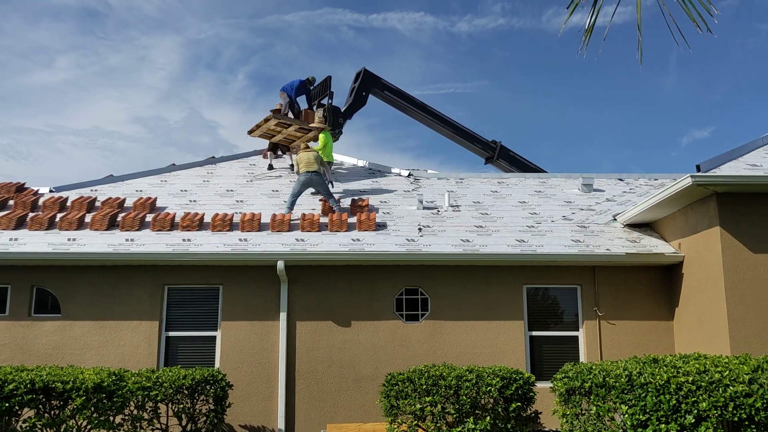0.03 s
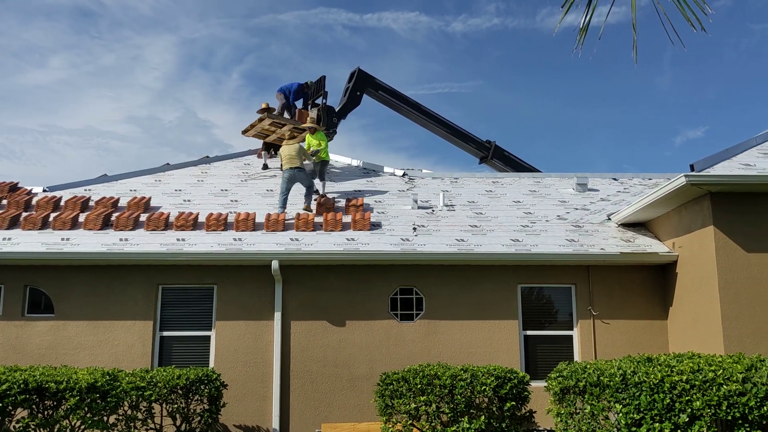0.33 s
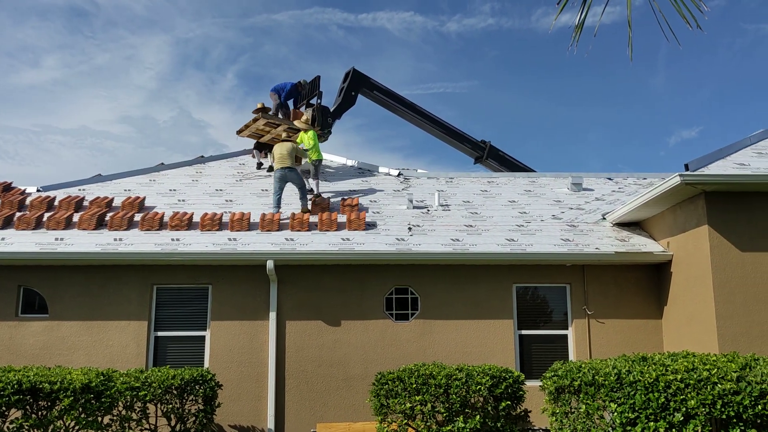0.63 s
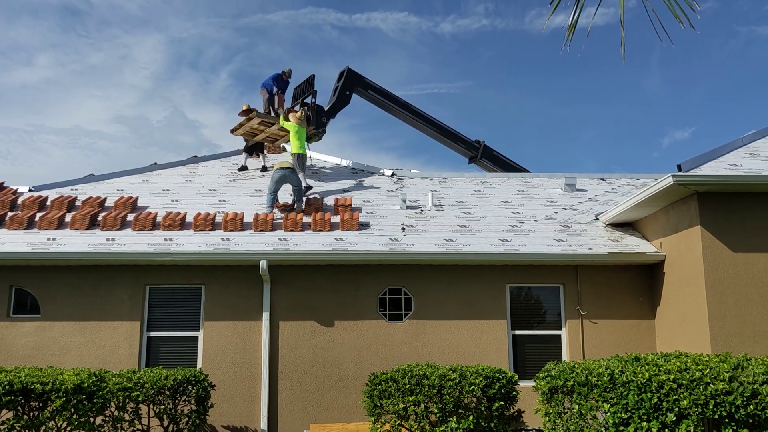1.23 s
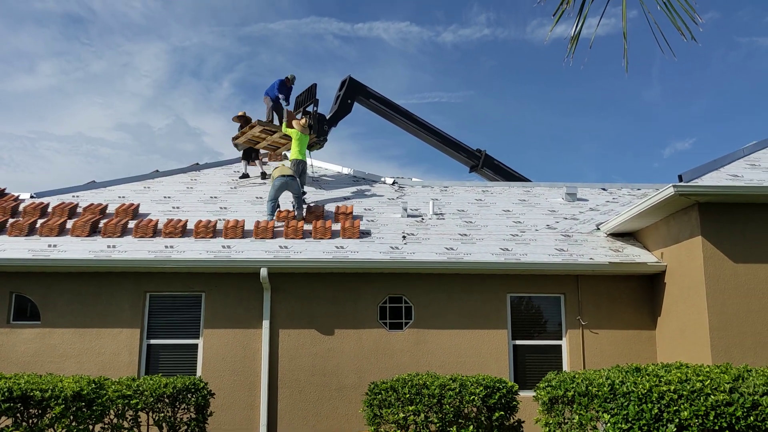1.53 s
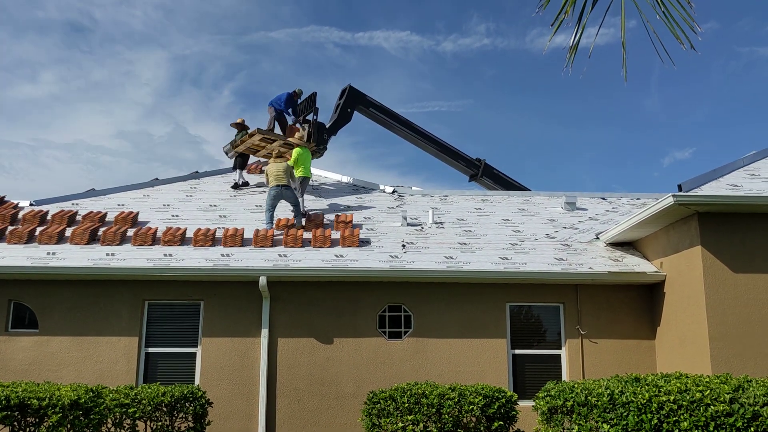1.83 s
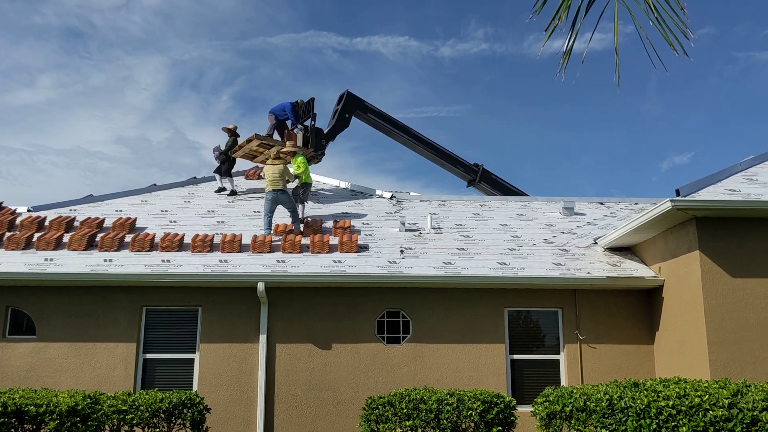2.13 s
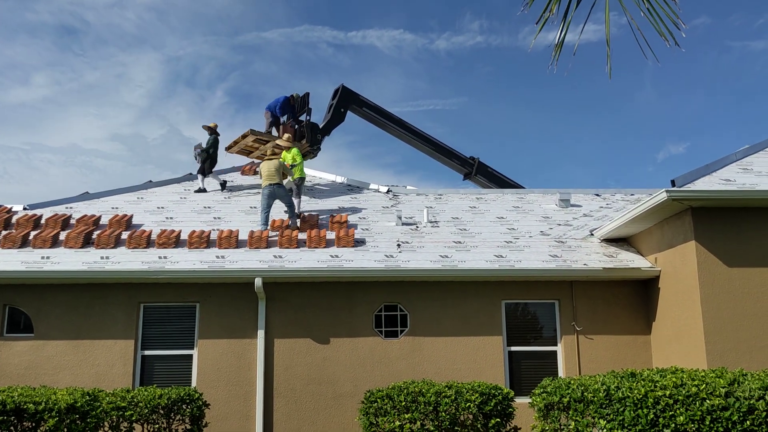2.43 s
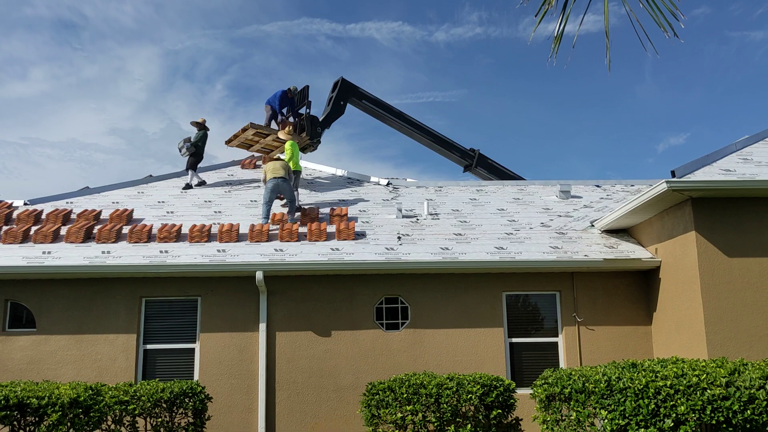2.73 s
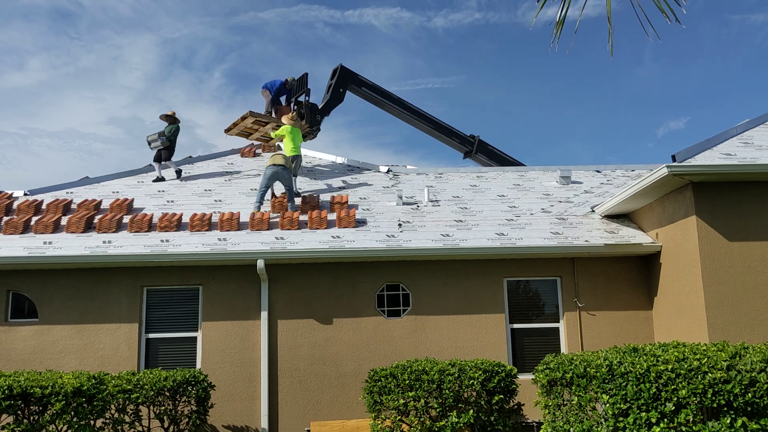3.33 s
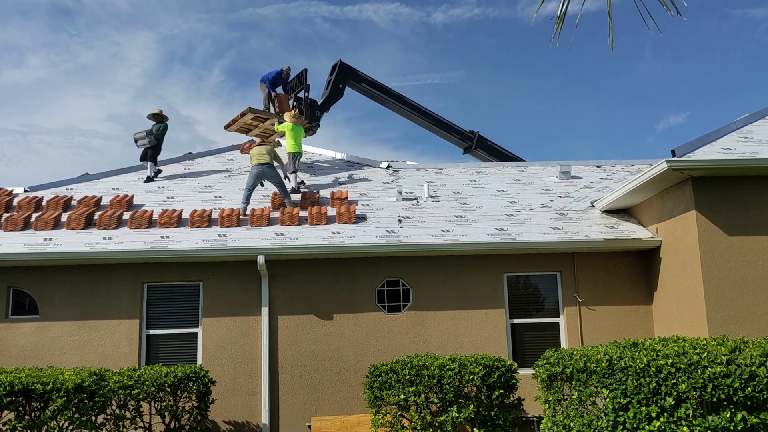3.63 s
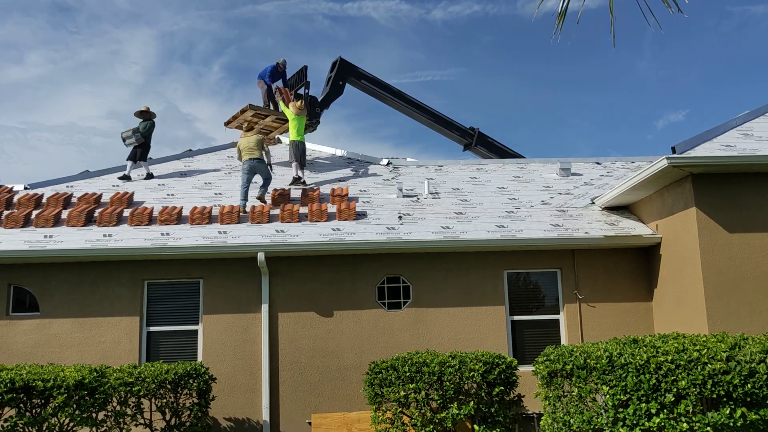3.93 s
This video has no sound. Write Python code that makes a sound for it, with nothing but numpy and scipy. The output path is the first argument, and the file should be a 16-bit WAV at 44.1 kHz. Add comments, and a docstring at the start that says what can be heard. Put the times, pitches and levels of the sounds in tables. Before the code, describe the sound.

Roof tiles are set down outdoors with light knocks and scrapes, a heavy booming drop, hollow clonks and a last loud clatter, each echoing briefly. Dry scuffs come from close by, while an engine idles faintly in a breeze.

```python
"""In a garden, below a roof where roofers unload heavy tiles from a lifted pallet and stack them.
Impacts excite the tiles' damped modes (clacks, clinks, hollow clonks), friction makes them scrape and
squeal, and the wooden deck booms under the load. The houses return the sound as echoes.
Dry, sandy scuffs sound close by, and the lift's engine idles under a light wind."""
import sys
import numpy as np
from scipy import signal
from scipy.fft import rfft, irfft
from scipy.io import wavfile

SR = 44100
rng = np.random.default_rng(int(sys.argv[2]) if len(sys.argv) > 2 else 0)


def waveform_to_disk(signal):
    """Save audio, clipped to [-1, 1], as 16-bit WAV at the path in sys.argv[1]."""
    frames = np.transpose(np.atleast_2d(signal))
    scaled = np.clip(frames, -1, 1) * 32767
    samples = np.round(scaled).astype(np.int16)
    wavfile.write(sys.argv[1], SR, samples)


N = 176400


def tile_clacks():
    """Impact excitation: tile strikes tile, each blow with its own balance of modes."""
    # t/s, low, middle and high level/dB, decay factor, rise/s, pitch factor
    blows = [(.296, -40.5, -26.5, -30.5, 0.83, 0.0063, 0.99),
             (0.351, -46.5, -34.5, -44, 1.45, 0.0037, 0.85), (.461, -37, -30, -35.5, 1.55, 0.0015, .88),
             (.490, -36, -35, -51, 1.2, 0.0028, 0.89), (.561, -42.5, -30, -35.5, 1.2, 0.0015, 0.96),
             (0.704, -47.5, -40.5, -43, 0.94, 0.0053, .92), (.929, -61, -52, -45, 1.5, 0.0018, 1.01),
             (1.317, -66, -52, -40, 0.24, 0.00074, 1.2), (2.238, -56.5, -39, -40, 1.9, 0.0049, 1.14),
             (2.279, -48.5, -40.5, -45.5, 3.5, 0.0088, 0.99), (3.223, -43.5, -32, -37, 2.75, 0.0024, 0.97),
             (3.292, -45, -21, -20.5, 1.27, 0.0043, 1.045), (3.301, -31.5, -26.5, -14, 1, 0.0036, 1),
             (3.318, -34.5, -18, -13, 0.85, 0.0028, 1.04), (3.353, -49, -31, -40, 1.6, 0.0034, 1.03),
             (3.388, -57, -31, -30.5, 0.9, 0.0084, 1.11), (3.406, -40.5, -24.5, -28, 1.1, 0.0062, 0.98),
             (3.734, -44.5, -46, -57, 0.62, 0.0023, 0.83)]
    return track((start, knock(tile_modes(), *blow, crunch_db=1)) for start, *blow in blows)


def bundle_drop():
    """Free vibration: a heavy bundle of tiles lands and settles, ringing at each contact."""
    # t/s, low, middle and high level/dB, decay factor, rise/s
    landings = [(1.465, -16.5, -20, -38, 1, 0.00087), (1.4727, -20, -15.5, -11.5, 1, 0.0021),
                (1.498, -36, -22.5, -24, 0.55, 0.0048), (1.546, -33.5, -29.5, -50, 0.7, 0.0042)]
    # Modes of the bundle: f/Hz, relative level/dB, nominal T60/s
    modes = [(322, -1.5, 0.065), (678, 2, .08), (772, -3, 0.13), (860, -4.5, 0.17), (1164, -1.5, 0.091),
             (1584, -0.5, 0.065), (1920, 3, 0.032), (2133, -1, .08), (2622, -1.5, 0.09),
             (3320, -12.5, 0.082), (3920, -16, 0.077)]
    return track((start, knock(modes, *blow, crunch_db=-3)) for start, *blow in landings)


def loose_clinks():
    """Free vibration: a loose tile settles, and its strong upper modes make it sound bright."""
    # t/s, low, middle and high level/dB, decay factor, rise/s
    contacts = [(1.362, -37, -28, -31.5, 1.1, 0.0094), (1.595, -48, -25, -21, 0.74, 0.0086),
                (1.620, -61, -31, -33, 1.5, 0.0027), (1.650, -53, -26.5, -29.5, 1.08, 0.0011)]
    # Modes of the loose tile: f/Hz, relative level/dB, nominal T60/s
    modes = [(310, -14, 0.088), (707.5, -7, 0.14), (901.7, -9, 0.2), (1127, -12, 0.055), (1353, -11, 0.12),
             (1646, -4.5, 0.078), (2150, 3.5, 0.067), (2340, -5, 0.055), (2690, 0, 0.058)]
    return track((start, knock(modes, *blow, crunch_db=3.5)) for start, *blow in contacts)


def stack_clonks():
    """Resonance: a tile set down on a stack rings hollow, with one middle mode dominant."""
    # t/s, low, middle and high level/dB, decay factor, pitch factor
    contacts = [(2.560, -44, -23, -26, 1.4, 0.78), (2.585, -45.5, -24, -32.5, 0.97, 0.96),
                (2.611, -50, -26.5, -42, 1.05, 0.94), (2.648, -43.5, -25, -35.5, 1.4, 0.8),
                (2.745, -29.5, -17, -31, 0.63, 0.95), (2.806, -48.5, -33.5, -45, 1.8, 0.93),
                (2.851, -45, -26, -39, 0.98, 0.81)]
    # Modes of the stack: nominal f/Hz, relative level/dB, nominal T60/s
    modes = [(270, -6.5, 0.085), (552, -12, 0.097), (693.4, 1, 0.071), (950, -9.5, 0.061),
             (1424, -12.5, 0.14), (1860, -6, 0.11), (2700, -6.5, 0.094)]
    return track((start, knock(modes, *blow, rise_s=0.0038, pitch=pitch))
                 for start, *blow, pitch in contacts)


def knock(modes, low_db, middle_db, high_db, decay, rise_s, pitch=1, crunch_db=0):
    """Impact: a gritty contact rings the modes; how the tile lands sets the level of three bands."""
    # Low, middle and high band: lower f/Hz, upper f/Hz
    bands = [(170, 470), (470, 1100), (1100, 15000)]
    # Contact noise: f/Hz, relative spectral level/dB
    crunch_spectrum = [(200, -2), (300, -11), (430, -8.5), (600, -0.5), (1500, -4.5), (2700, 1.5),
                       (3300, -22), (3950, -13.5), (5000, -21), (15000, -69)]
    crunch_t60_s, strike_s = 0.072, 0.017
    t, strike = np.arange(SR // 3) / SR, slice(round(strike_s * SR))
    body = ring(modes, t, decay, pitch)
    crunch = colour(grit(t, spread_db=-1), crunch_spectrum)
    crunch *= amp(crunch_db - 60 * t / (crunch_t60_s * decay))
    contact = (body / body[strike].std() + crunch) * np.minimum(t / rise_s, 1)
    sound = np.zeros(len(t))
    for band, db in zip(bands, (low_db, middle_db, high_db)):
        part = signal.sosfilt(signal.butter(3, band, "bandpass", fs=SR, output="sos"), contact)
        sound += amp(db) * part / part[strike].std()
    return sound


def tile_modes(spread_db=3, t60_s=0.085):
    """Modal excitation: where a tile is struck, here by chance, decides how strongly each mode rings."""
    # Natural frequencies of a tile: f/Hz
    mode_hz = [258, 323, 528, 675, 776, 899, 1179, 1247, 1493, 1618, 1770, 2094, 2172, 2612, 2903, 3300,
               3920]
    # Mean strength of each mode: relative level/dB
    mode_db = [-2.5, -5, -2, 1, -2, -3.5, 1, -4.5, -0.5, 1, -3, 3, -5, 0.5, -8.5, -13, -9]
    return [(hz, db + spread_db * rng.standard_normal(), t60_s) for hz, db in zip(mode_hz, mode_db)]


def ring(modes, t, decay, pitch, phase_spread=1):
    """Modal superposition: a sum of damped sines; decay scales each T60, pitch each frequency."""
    return sum(amp(db - 60 * t / (t60 * decay))
               * np.sin(2 * np.pi * (hz * pitch * t + phase_spread * rng.random()))
               for hz, db, t60 in modes)


def edge_tones(bandwidth_hz=47):
    """Narrow resonance: short tones from tile edges, heard as gliding squeals and one faint clink."""
    # t/s, duration/s, first f/Hz, last f/Hz, level/dB
    tones = [(.422, .035, 756, 820, -38), (.482, 0.034, 480, 590, -38), (.635, .03, 825, 880, -44.5),
             (.957, .09, 1085, 1260, -44.5), (0.966, 0.096, 1810, 1770, -46.5)]
    pole = np.exp(-np.pi * bandwidth_hz / SR)
    out = np.zeros(N)
    for start, length, from_hz, to_hz, db in tones:
        t = np.arange(0, length, 1 / SR)
        carrier = np.exp(2j * np.pi * np.cumsum(np.linspace(from_hz, to_hz, len(t))) / SR)
        # Shifted down, low-passed and shifted back, the noise keeps only a band around the glide.
        baseband = signal.lfilter([1 - pole], [1, -pole], grit(t, spread_db=4.5) / carrier)
        tone = (carrier * baseband).real
        add(out, start, amp(db) * unit(tone * np.sin(np.pi * t / length) ** .5))
    return out


def tile_scrapes():
    """Sliding friction: tile rubs unevenly on tile, and the noise drives the tile's modes."""
    # t/s, duration/s, level/dB
    slides = [(0, 0.14, -41), (0.268, 0.14, -38.5), (0.406, 0.18, -41), (0.96, 0.086, -45),
              (1.137, 0.21, -47), (1.30, 0.22, -41.5), (1.802, 0.2, -53), (2.557, 0.34, -41),
              (3.33, 0.16, -39.5)]
    # Friction noise: f/Hz, relative spectral level/dB
    rub_spectrum = [(150, -8.5), (260, -7), (400, -10), (560, 4), (850, 2), (1200, -1), (1700, 1.5),
                    (2700, -3.5), (3300, -15.5), (5500, -21), (15000, -67)]
    out = np.zeros(N)
    for start, length, db in slides:
        t = np.arange(0, length, 1 / SR)
        stroke = np.sin(np.pi * t / length) ** .5 * amp(1.9 * wander(t, rate_hz=42.1))
        rub = colour(grit(t, spread_db=1.5), rub_spectrum)
        response = ring(tile_modes(), t, decay=0.32, pitch=0.99)
        singing = unit(signal.fftconvolve(rub, response)[:len(t)])
        add(out, start, amp(db) * unit(stroke * (rub + amp(-4) * singing)))
    return out


def grit(t, spread_db, snaps_per_s=900):
    """Shot noise of a rough contact: small snaps of uneven size over fine noise."""
    hits = rng.random(len(t)) < snaps_per_s / SR
    sizes = amp(spread_db * np.minimum(rng.exponential(1, len(t)), 3))
    fine, sign = rng.standard_normal((2, len(t)))
    return unit(hits * sizes * np.sign(sign)) + amp(-0.5) * fine


def deck_booms(rise_s=0.013):
    """Transient response: a sudden load starts the low modes of the wooden deck in phase."""
    # t/s, level/dB, pitch factor
    loads = [(1.363, -30, 0.99), (1.47, -24, 0.53), (1.481, -21, 1.45), (1.486, -24.5, 0.93),
             (1.542, -28, 1.3), (3.225, -32.5, 1.09), (3.302, -24.5, 1.06), (3.387, -27, 1.12)]
    # Modes of the deck: nominal f/Hz, relative level/dB, nominal T60/s
    modes = [(83.1, 0, 0.33), (95.9, -3, 0.25), (272, -24, .1)]
    t = np.arange(SR // 2) / SR
    onset = np.sqrt(2) * np.minimum(t / rise_s, 1)
    return track((start, amp(db) * onset * ring(modes, t, decay=0.86, pitch=pitch, phase_spread=0))
                 for start, db, pitch in loads)


def near_scuffs(hiss_rise_s=0.002, body_rise_s=0.0053):
    """Friction noise of short sandy rubs: a sharp hiss, then a duller body; both hold and die away."""
    # t/s, hold/s, T60/s, relative hiss level/dB, relative body level/dB
    rubs = [(0.086, 0.006, 0.092, -56.5, -45), (0.138, 0.012, 0.2, -59, -44.5),
            (0.231, 0.017, 0.14, -54.5, -42.5), (0.369, 0.023, .1, -59, -47),
            (0.456, 0.008, 0.24, -46, -35.5), (0.51, 0.016, 0.11, -58, -49),
            (.546, 0.0017, .03, -36.5, -41), (1.313, 0.0025, 0.09, -47.5, -34),
            (1.468, 0.0078, 0.17, -51, -37), (1.591, 0.089, 0.13, -58.5, -51.5),
            (1.727, 0.017, 0.088, -52.5, -41), (1.804, 0.011, 0.17, -53.5, -38.5),
            (1.933, 0.025, 0.075, -50, -41), (1.99, 0.028, 0.05, -53, -42.5),
            (2.084, 0.01, 0.058, -59, -65), (2.339, 0.028, 0.11, -38.5, -27),
            (2.423, 0.039, 0.14, -47.5, -33.5), (2.552, 0.0046, 0.15, -40.5, -33.5),
            (2.637, 0.0062, 0.24, -44, -44), (2.688, 0.026, 0.51, -54, -46),
            (2.888, 0.0065, 0.06, -45, -69), (3.299, 0.0048, 0.1, -37, -16.5),
            (3.372, 0.029, 0.084, -53, -51), (3.731, 0.013, 0.04, -56.5, -44)]
    # Hiss common to both channels: f/Hz, relative spectral level/dB
    hiss_spectrum = [(1500, -35), (3500, -19), (5000, 14), (7000, -12), (8000, -26.5), (10000, -21),
                     (15000, -11)]
    # Body of the rub: f/Hz, relative spectral level/dB
    body_spectrum = [(150, -25.5), (280, -2.5), (600, -5), (1500, -2.5), (2300, 0.5), (3200, -2.5),
                     (4200, -4), (6000, -12), (15000, -58)]
    # Hiss independent in each channel: f/Hz, relative spectral level/dB
    fizz_spectrum = [(2500, -4), (5000, -1.5), (7000, 5.5), (8000, -6.5), (10000, 0), (15000, -10.5)]
    hiss_gain, body_gain = np.zeros((2, N))
    t = np.arange(SR // 3) / SR
    for start, hold, t60, hiss_db, body_db in rubs:
        fade = amp(-60 * np.maximum(t - hold, 0) / t60)
        add(hiss_gain, start, amp(hiss_db) * fade * np.minimum(t / hiss_rise_s, 1))
        add(body_gain, start, amp(body_db) * fade * np.minimum(t / body_rise_s, 1))
    grains = sand_crackle(spread_db=3)
    hiss = amp(-10) * hiss_gain * colour(grains, hiss_spectrum)
    body = body_gain * colour(grains, body_spectrum)
    fizz = np.array([colour(sand_crackle(spread_db=4), fizz_spectrum) for channel in range(2)])
    return stereo(hiss + body, lag_s=.00008, left_db=1.7) + amp(0.5) * hiss_gain * fizz


def sand_crackle(spread_db, grains_per_s=6000, grain_s=.002):
    """Shot noise: sand grains snap at random times, each with its own pitch and size."""
    when, pitch, size = rng.random((int(grains_per_s * N / SR), 3)).T[:, :, None]
    k = np.arange(round(grain_s * SR))
    strength = amp(-spread_db * np.log(np.maximum(size, .05)))
    grains = strength * (1 - k / len(k)) ** 2 * np.sin(np.pi * pitch * k)
    positions = (when * N).astype(int) + k
    return np.bincount(positions.ravel(), grains.ravel(), N)[:N]


def early_echoes(direct):
    """Specular reflection: roof and walls return delayed, weaker copies."""
    # delay/s, relative level/dB
    paths = [(.0105, -15.5), (.026, -21), (.066, -25)]
    return track((delay, amp(db) * direct) for delay, db in paths)


def yard_reverb(x, echoes_per_s=3000, rise_s=0.0039):
    """Scattering: houses and hedges return dense echoes, each band dying at its own rate."""
    # Reverberation time: f/Hz, T60/s
    decay_times = [(80, 1), (300, 0.46), (800, 0.68), (2500, 0.54), (5000, 0.3), (15000, 0.51)]
    taps = rng.standard_normal((2, SR)) * (rng.random((2, SR)) < echoes_per_s / SR)
    hz, t, bands = signal.stft(diffuse(taps), SR, nperseg=256)
    envelope = amp(-60 * t / read(decay_times, hz)[:, None]) * np.minimum(t / rise_s, 1)
    tail = signal.istft(bands * envelope, SR, nperseg=256)[1]
    return signal.fftconvolve(x[None], tail / np.linalg.norm(tail[0]), axes=1)[:, :N]


def lift_engine():
    """Modulated tones: the idling engine hums in low partials that waver in level and phase."""
    # f/Hz, level/dB
    partials = [(30, -56), (60.3, -57.5), (90.5, -57.5), (101, -61), (121, -56)]
    t, hum = np.arange(N) / SR, np.zeros(N)
    for hz, db in partials:
        peak = np.sqrt(2) * amp(db + 2 * wander(t, rate_hz=3.6))
        hum += peak * np.sin(2 * np.pi * hz * t + wander(t, rate_hz=2.305))
    return hum


def wind_gusts():
    """Pressure fluctuation: soft gusts on the microphone make brief swells of rumble."""
    # t/s, duration/s, level/dB
    gusts = [(0.578, 0.12, -42), (2.04, 0.11, -44.5)]
    # Rumble: f/Hz, relative spectral level/dB
    spectrum = [(10, 11), (30, 17), (60, 11), (110, -8), (300, -50), (2000, -90)]
    out = np.zeros(N)
    for start, length, db in gusts:
        swell = np.hanning(round(length * SR))
        rumble = colour(rng.standard_normal(SR), spectrum)[:len(swell)]
        add(out, start, amp(db) * unit(swell * rumble))
    return out


def outdoor_air(level_db=-45, breeze_top_hz=1500):
    """Diffuse ambient noise: its lower part wavers in the breeze while the treble stays steady."""
    # f/Hz, relative spectral level/dB
    spectrum = [(12, -32), (20, 0.5), (129, -14.5), (153, -21), (274, -25.5), (416, -35), (686, -24),
                (1050, -28), (1920, -26.5), (4550, -39.5), (5850, -47), (10500, -49), (15500, -50)]
    air = colour(diffuse(rng.standard_normal((2, N))), spectrum)
    breeze = signal.sosfilt(signal.butter(2, breeze_top_hz, fs=SR, output="sos"), air)
    waver = amp(1.46 * wander(np.arange(N) / SR, rate_hz=9)) - 1
    return amp(level_db) * (air + breeze * waver)


def diffuse(pair):
    """Diffuse-field coherence: two independent noises are made alike in the bass."""
    # f/Hz, left-right correlation
    coherence = [(50, 0.97), (300, .95), (1000, 0.088), (2500, 0.041), (5000, 0.041), (15000, 0.037)]
    left, other = rfft(pair)
    alike = read(coherence, freqs(pair))
    right = alike * left + np.sqrt(1 - alike ** 2) * other
    return irfft(np.array([left, right]), pair.shape[-1])


def stereo(x, lag_s, left_db=0):
    """Path difference: sound from the right reaches the left later; left_db is left over right."""
    left = irfft(rfft(x) * np.exp(-2j * np.pi * freqs(x) * lag_s), len(x))
    return np.array([left * amp(left_db / 2), x * amp(-left_db / 2)])


def wander(t, rate_hz):
    """Random modulation: a sum of sines below rate_hz, rms about 1."""
    f, phase = rng.random((2, 16, 1))
    return np.sin(2 * np.pi * (rate_hz * f * t + phase)).sum(0) / np.sqrt(len(f) / 2)


def colour(x, spectrum):
    """Spectral shaping, at rms 1."""
    return unit(irfft(rfft(x) * amp(read(spectrum, freqs(x))), x.shape[-1]))


def read(points, hz):
    """Interpolation on a log-frequency axis."""
    f, value = np.transpose(points)
    return np.interp(np.log(hz + 1), np.log(f + 1), value)


def freqs(x):
    """Frequencies of the spectrum of x."""
    return np.fft.rfftfreq(x.shape[-1], 1 / SR)


def amp(db):
    """Level to amplitude ratio."""
    return 10 ** (np.asarray(db) / 20)


def unit(x):
    """Normalisation to rms 1."""
    return x / np.sqrt(np.mean(x ** 2) + 1e-20)


def add(mix, start_s, sound):
    """Superposition of one sound on the mix."""
    part = mix[round(start_s * SR):][:len(sound)]
    part += sound[:len(part)]


def track(events):
    """Superposition of (t/s, sound) pairs."""
    mix = np.zeros(N)
    for start, sound in events:
        add(mix, start, sound)
    return mix


def scene():
    """Superposition of the roof work, the near scuffs, their echoes and the background."""
    direct = (tile_clacks() + bundle_drop() + edge_tones() + loose_clinks() + stack_clonks()
              + tile_scrapes() + deck_booms())
    near = near_scuffs()
    roof = stereo(direct + early_echoes(direct), lag_s=.000102)
    reverb = amp(-12.5) * yard_reverb(direct + amp(9.5) * near.mean(0))
    return roof + near + reverb + lift_engine() + wind_gusts() + outdoor_air()


def record(dry):
    """Clipping of the highest peaks, then band limiting."""
    ceiling, cutoff_hz = .93, 15900
    lowpass = signal.firwin(511, cutoff_hz, window=("kaiser", 9), fs=SR)
    return signal.oaconvolve(np.clip(dry, -ceiling, ceiling), lowpass[None], "same")


dry = scene()
out = record(dry)
waveform_to_disk(out)
```